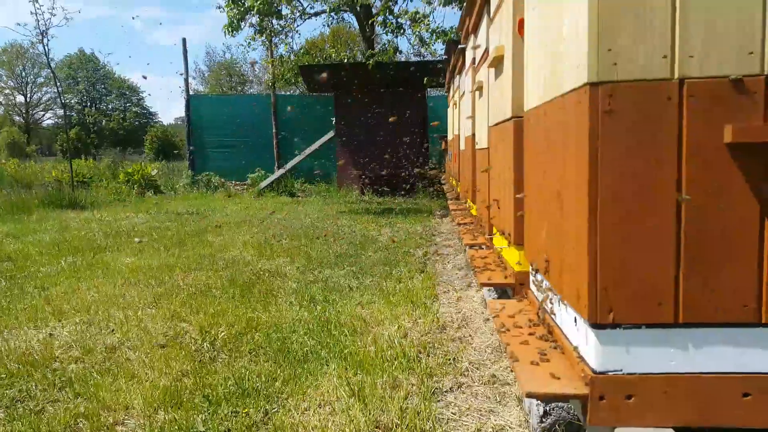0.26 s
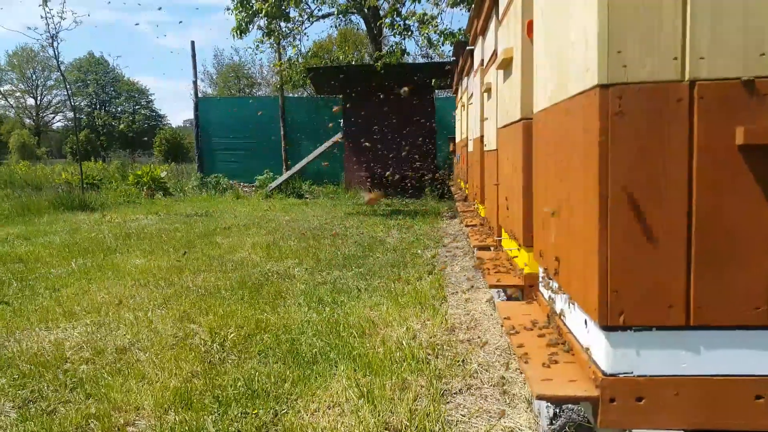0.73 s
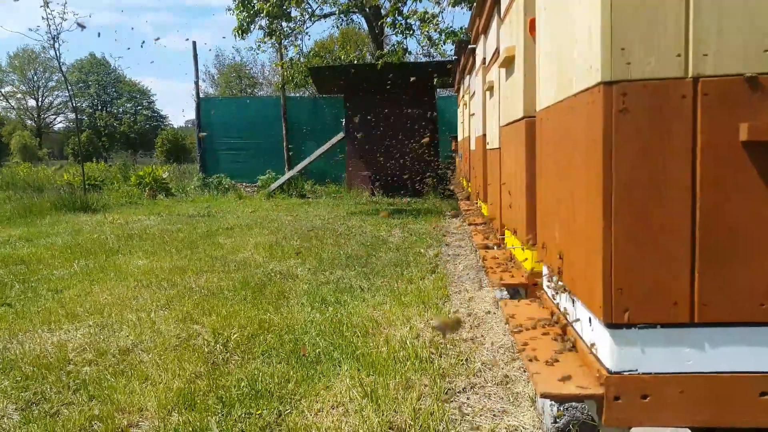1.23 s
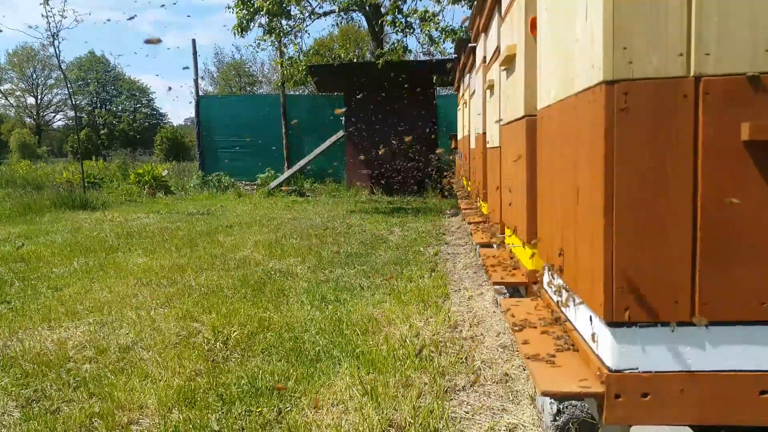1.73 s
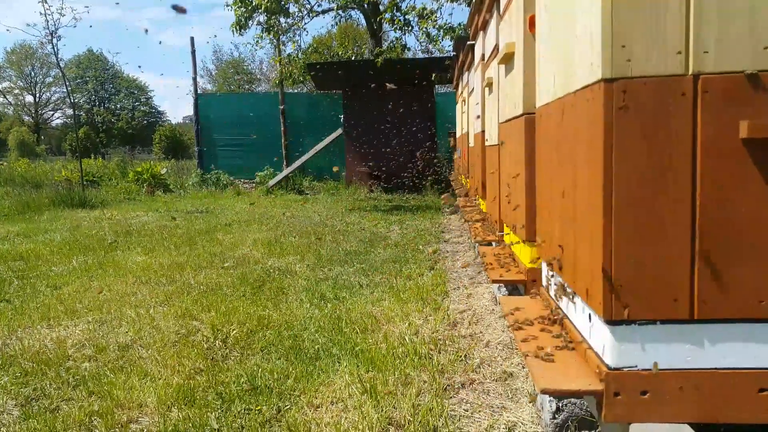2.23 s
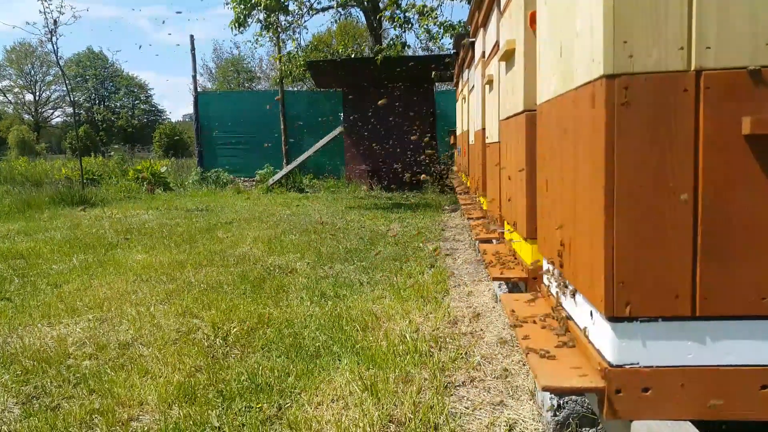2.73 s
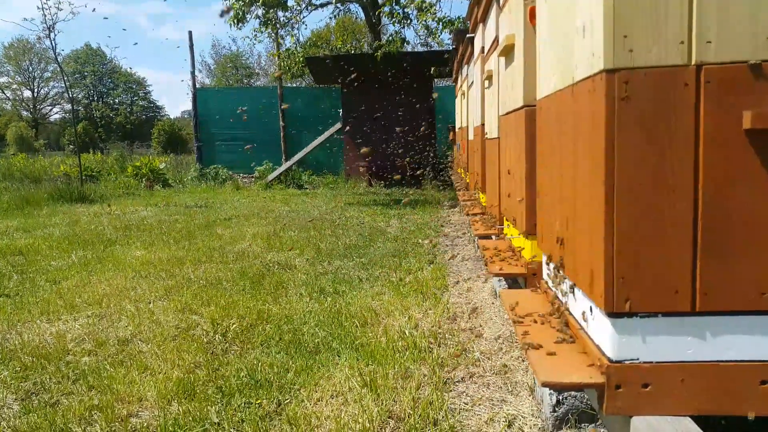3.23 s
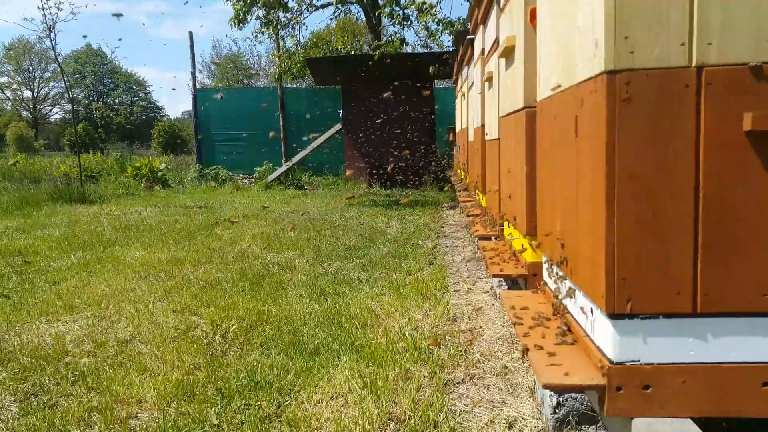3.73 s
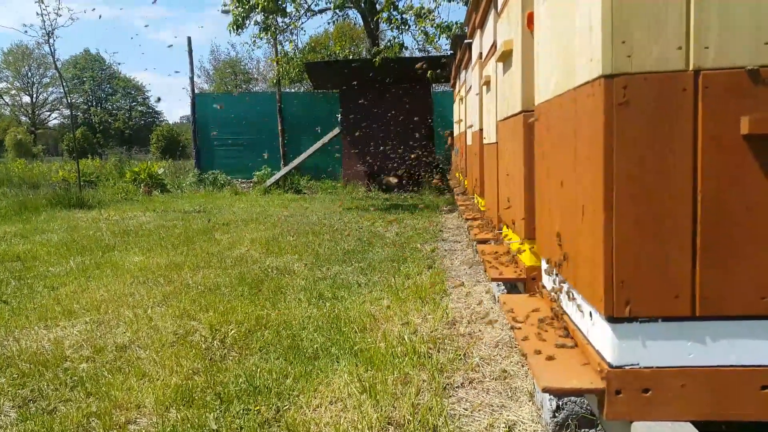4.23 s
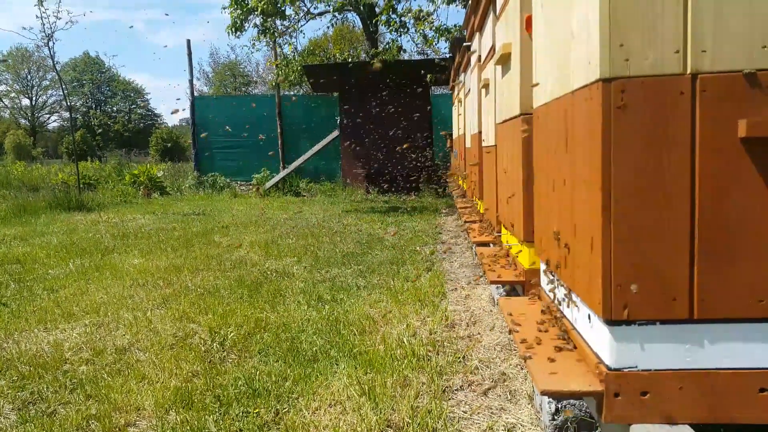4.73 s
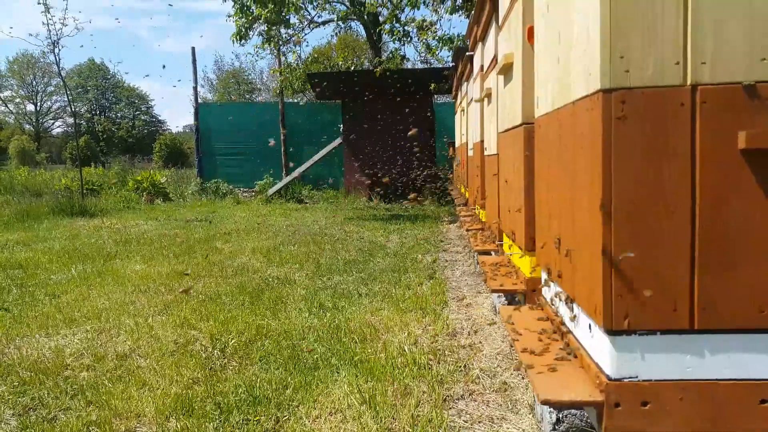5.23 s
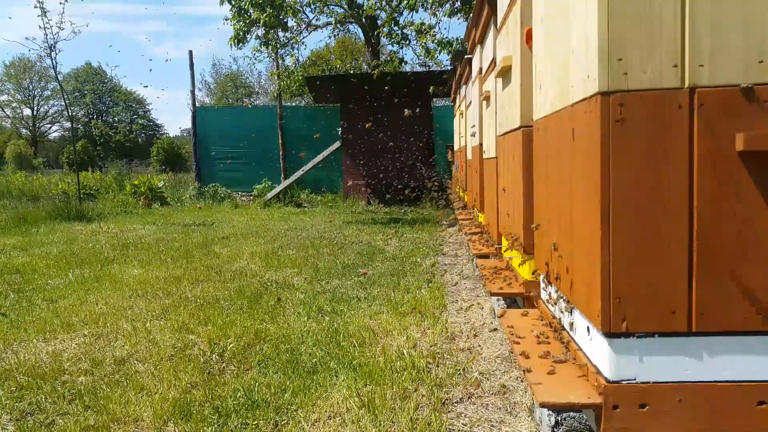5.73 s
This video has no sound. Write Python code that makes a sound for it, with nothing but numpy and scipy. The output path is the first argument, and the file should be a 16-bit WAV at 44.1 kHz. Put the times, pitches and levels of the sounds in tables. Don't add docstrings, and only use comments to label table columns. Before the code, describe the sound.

A swarm buzzes close to a camera beside a row of hives outdoors, a blurred mass of low wing beats with a raspy edge. Individual bees swing near, then deeper ones pass, most strongly around the middle. Small taps, ticks and two hard bumps interrupt the hum. Low, lumpy wind buffets both sides; faint hiss lies underneath. The left side sounds covered, the right open and clearer.

```python
import sys
import numpy as np
from scipy import signal
from scipy.fft import rfft, irfft, next_fast_len
from scipy.io import wavfile
from scipy.ndimage import map_coordinates

SR = 44100
rng = np.random.default_rng(int(sys.argv[2]) if len(sys.argv) > 2 else 0)


def to_linear_factor(level_db):
    exponent = np.asarray(level_db, float) / 20
    return 10 ** exponent


def unload_audio(sound):
    columns = np.transpose(np.atleast_2d(sound))
    steps = np.round(np.clip(columns, -1, 1) * 32767)
    wavfile.write(sys.argv[1], SR, steps.astype(np.int16))


N = 263277
STEP = 4
RASP_DB = -47


# f/Hz, level/dB
OPEN_PORT = [(120, 1.5), (500, -1.5), (700, -5), (1000, 1.5), (1400, 1.5), (1750, -3), (2100, -9.5),
             (3500, -12.5), (4700, -22.5), (6500, -26.5), (9000, -33), (16000, -60)]
COVERED_PORT = [(120, -3), (250, -16), (480, -23), (800, -17.5), (1300, -30), (2500, -28.5), (4000, -52),
                (6000, -57), (16000, -70)]


def bees():
    near = near_swarm() + drones() + hovering_bee()
    far_left, far_right = far_swarm()
    left = coloured(near[0], COVERED_PORT) + to_linear_factor(-16.5) * far_left
    right = coloured(near[1] + far_right, OPEN_PORT)
    return np.array([left, right])


def near_swarm():
    thick_db = swarm_thickness()
    rasp = crowd(count=50, beat_hz=226.1, spread=.15, orders=range(3, 20), swell_db=4, drift=.035)
    beat = crowd(count=28, beat_hz=233.6, spread=.12, orders=[1], swell_db=4.5, drift=.04)
    octave = crowd(count=34, beat_hz=225.9, spread=.14, orders=[2], swell_db=4, drift=.045)
    hum = to_linear_factor(RASP_DB + 3.0) * rasp + to_linear_factor(-52.5 - 1.0) * beat + to_linear_factor(-50.5 + 0.34) * octave
    return to_linear_factor(thick_db) * hum


# t/s, level/dB
SWARM = [
    (.6, -0.5),
    (1.85, .5),
    (3, 0),
    (4.3, -0.5),
    (5.1, 0.15),
    (5.9, -0.5),
]


def swarm_thickness():
    thick_db, = curves(SWARM)
    return thick_db


def crowd(count, beat_hz, spread, orders, swell_db, drift):
    own_rate = spread * rng.uniform(-1, 1, (count, 1))
    waver = drift * wobble(5, count) + .012 * wobble(35, count)
    hz = beat_hz * (1 + own_rate + waver)
    tone = wings(hz, orders) * to_linear_factor(swell_db * wobble(8, count))
    left = (tone * wobble(9, count)).sum(axis=0)
    right = tone.sum(axis=0)
    return unit(full(np.array([left, right])))


def wings(hz, orders, tilt_db=0):
    size = 2048
    cycle = np.arange(size) / size
    shape = 0
    for k in orders:
        strength = to_linear_factor(tilt_db * k + rng.normal(0, 2.9, (len(hz), 1)))
        phase = rng.random((len(hz), 1))
        shape = shape + strength * np.sin(2 * np.pi * (k * cycle + phase))
    place = (np.cumsum(hz, axis=1) * STEP / SR * size).astype(int) % size
    return np.take_along_axis(shape, place, axis=1)


# t/s, half length/s, level rise/dB
DRONES = [
    (1.05, .2, 6),
    (1.9, .15, -1),
    (2.88, .12, 12),
    (3.65, 0.14, 9),
    (4.0, 0.25, 15),
    (4.35, 0.13, 11.5),
    (4.8, 0.16, 7.5),
    (5.75, 0.24, 8),
]


def drones():
    level_db = -61 + swells(DRONES)[0]
    return to_linear_factor(level_db - 5) * crowd(count=4, beat_hz=146.7, spread=.025, orders=[1], swell_db=4.0, drift=0.01197)


# t/s, f/Hz
HOVER = [
    (1.65, 245),
    (1.85, 246),
    (2.05, 236),
    (2.4, 240),
    (2.7, 239),
    (2.95, 226),
]
# t/s, half length/s, level rise/dB
SWAYS = [
    (1.73, 0.027, 15),
    (2.05, 0.095, 1),
    (2.25, 0.14, 14.5),
    (2.46, 0.04, 13),
    (2.71, 0.058, 13),
]


def hovering_bee():
    hover_hz, = curves(HOVER)
    level_db = -72 + swells(SWAYS)[0]
    present = np.interp(np.arange(N) / SR, [1.6, 1.75, 2.85, 3], [0, 1, 1, 0])
    beat_hz = hover_hz[None, ::STEP] * (1 + 0.0074 * wobble(26.7, count=1))
    tone = unit(full(wings(beat_hz, range(1, 3), tilt_db=-18)))
    return present * to_linear_factor(level_db + 7.5) * tone


# f/Hz, level/dB
BLUR = [
    [(150, -30), (300, -2), (900, -25), (2800, -37), (5000, -18), (9000, -17)],
    [(150, 1.5), (300, 3), (700, 3), (1500, 2.5), (5000, 7), (9000, -12.5)],
]


def far_swarm():
    level = to_linear_factor(RASP_DB + swarm_thickness() + 6)
    return [level * coloured(rng.standard_normal(N), port) for port in BLUR]


# t/s, push level/dB, contact/ms,
# sharpness of the rebound, cavity ring level/dB
BUMPS = [(0.7014, -25.5, 0.17, 0.84, -36), (0.7283, 0, 0.55, 1.5, -14), (0.8275, -15.5, 1.14, 0.73, -48),
         (1.349, -25, 2, 1.8, -60), (3.14, -24.5, 1.5, 1.3, -60), (3.201, -27, 1.8, 1, -60),
         (3.328, -24.5, 2.23, 1.3, -60), (4.09, -25, 1.5, 0.7, -60), (4.505, -30, 1.93, 1.7, -60),
         (5.3243, -3, 0.57, 1.66, -20.5), (5.4146, -13, 1.04, 1.0, -60)]
# f/Hz, level/dB, t60/s
HOUSING = [(94, -25, 0.069), (163, -26, 0.0505), (305, -38, 0.025)]


def bumps():
    out, t = np.zeros((2, N)), np.arange(SR // 8) / SR
    jw = 2j * np.pi * np.fft.rfftfreq(len(t), 1 / SR)
    corner, vent = 2 * np.pi * 88, 2 * np.pi * 160
    cavity = ring(1400, 0.0091, t) + 0.45 * ring(3000, 0.0042, t) + 0.71 * ring(460, 0.022, t)
    for s, db, ms, sharp, ring_db in BUMPS:
        contact = t / (ms / 1000)
        push = to_linear_factor(db) * contact * np.exp(1 - contact)
        membrane = jw ** 2 / (jw ** 2 + jw * corner / sharp + corner ** 2)
        cut = membrane * jw / (jw + vent)
        right = irfft(rfft(push) * cut, len(t)) + to_linear_factor(ring_db) * cavity
        right = soft(right, hz=min(850 / ms ** 2, 3600))
        shake = sum(to_linear_factor(db + level) * ring(hz, t60, t) for hz, level, t60 in HOUSING)
        left = -shake * (1 - np.exp(-t / 0.0032)) - to_linear_factor(-31.0) * right
        out[:, round(s * SR):][:, :len(t)] += [left, right]
    return out


# t/s, f/Hz, t60/ms, left level/dB, right level/dB
TAPS = [(.8783, 200, 30, -30, -60), (0.8782, 430, 16, -37, -20.5), (.8789, 1450, 5, -53, -25),
        (.882, 114, 60, -29, -60), (2.2085, 420, 14, -39, -60), (2.2087, 1500, 6, -44, -60),
        (2.7225, 95, 45, -33, -70), (3.1153, 6000, 1.2, -70, -49), (3.11542, 1650, 3.4, -70, -17.5),
        (3.11612, 1220, 4.8, -70, -20), (4.2485, 453.6, 14, -41, -56), (4.2505, 1200, 6, -43, -60),
        (4.68, 90, 40, -33, -70), (5.13, 8500, 1.5, -75, -58), (5.4128, 2200, 3, -70, -45)]


def taps():
    out, t = np.zeros((2, N)), np.arange(SR // 8) / SR
    for s, hz, ms, left_db, right_db in TAPS:
        tap = soft(ring(hz, ms / 1000, t), hz=2.4 * hz)
        out[:, round(s * SR):][:, :len(t)] += to_linear_factor([[left_db], [right_db]]) * tap
    return out


def ring(hz, t60, t):
    return np.sin(2 * np.pi * hz * t) * to_linear_factor(-60 * t / t60)


def soft(x, hz):
    return signal.sosfilt(signal.butter(6, hz, fs=SR, output="sos"), x)


# start t/s, end t/s, level/dB
FLYBY = (0.677, .772, -46.5)


def flyby():
    start, end, db = FLYBY
    moments = [start, start + .03, start + .05, end - .025, end - .01, end]
    shape = np.interp(np.arange(N) / SR, moments, [0, 1.3, 0.56, 0.79, 0.41, 0])
    spectrum = [(500, 3.5), (4000, 4), (6500, -11), (8500, -19), (11000, -8.5), (14000, -19)]  # f/Hz, level/dB
    air = coloured(rng.standard_normal(N), spectrum)
    flutter = to_linear_factor(3.8 * full(wobble(59.43, count=1))[0])
    return to_linear_factor([[db - 40], [db]]) * shape * unit(air * flutter)


# f/Hz, level/dB
BUFFET = [
    [(20, -22), (45, 0.5), (100, -0.5), (150, -6.5), (260, -23), (400, -25), (2000, -67)],
    [(20, -24), (40, -17), (70, -3), (120, -3.5), (200, -6.5), (320, -16.5), (800, -20), (2000, -61)],
]
CALM_DB = [
    [-55],
    [-58],
]
# t/s, half length/s, left level rise/dB, right level rise/dB
GUSTS = [(.58, .06, 4, 4), (.85, 0.13, 7, 12), (1.1, 0.146, -3.5, 6.5), (1.4, 0.17, 4, 4),
         (1.68, 0.15, 0.5, 5), (1.97, 0.052, 6, 1), (2.12, 0.093, 0, 6.5), (2.28, .06, 1, 0),
         (2.68, 0.073, -3, 6), (2.86, 0.17, 7, 0), (3.2, 0.12, 1.5, 10), (3.39, 0.12, 3, 7.5),
         (3.6, 0.12, 4.5, 9), (4.12, 0.11, 0, 12.5), (4.35, 0.09, 9, 11), (4.52, 0.046, -1, 8.5),
         (4.72, 0.076, 5.5, 0), (5.1, .08, 3, 2), (5.45, 0.11, 4.5, 12.5), (5.74, 0.1, -1, 8.5),
         (5.9, 0.071, 2, -3)]


def wind():
    lumps = to_linear_factor(1.75 * full(wobble(14, count=2)))
    air = np.array([unit(coloured(rng.standard_normal(N), port)) for port in BUFFET])
    rising_db = np.interp(np.arange(N) / SR, [.3, .6], [-6, 0])
    return to_linear_factor(CALM_DB + swells(GUSTS) + 1.0 + rising_db) * unit(air * lumps)


# f/Hz, level/dB
HISS = [
    [(300, 12), (3000, 1.5), (6500, -12.5), (10000, -2), (15500, 4.5)],
    [(300, -11), (7500, -3), (9000, -5), (10500, 1.5), (12500, 0.5), (15500, -2)],
]


def camera_noise():
    hiss = to_linear_factor(-68.5) * np.array([unit(coloured(rng.standard_normal(N), port)) for port in HISS])
    clock = to_linear_factor(-92) * np.sin(2 * np.pi * 12000 * np.arange(N) / SR) * [[0], [1]]
    return hiss + clock


def unit(x):
    return x / np.sqrt(np.mean(x ** 2, axis=-1, keepdims=True) + 1e-20)


def curves(rows):
    s, *cols = np.transpose(rows)
    return [np.interp(np.arange(N) / SR, s, c) for c in cols]


def swells(rows):
    s, half, *rise_db = np.transpose(rows)
    distance = (np.arange(N) / SR - s[:, None]) / half[:, None]
    return np.array(rise_db) @ np.exp(-distance ** 2)


def wobble(rate, count):
    knots = rng.standard_normal((count, 400))
    places = np.arange(0, N + 128, 64) * rate / SR
    rows, at = np.meshgrid(np.arange(count), places, indexing="ij")
    curve = map_coordinates(knots, [rows, at])
    return np.repeat(curve, 64 // STEP, axis=1)[:, :N // STEP + 1]


def full(x):
    return signal.resample_poly(x, STEP, 1, axis=-1)[..., :N]


def coloured(x, points):
    m = next_fast_len(N + 8192)
    f, db = np.transpose(points)
    hz = np.fft.rfftfreq(m, 1 / SR)
    gain = to_linear_factor(np.interp(np.log(hz + 1), np.log(f), db))
    return irfft(rfft(x, m) * gain, m)[:N]


def scene():
    return bees() + bumps() + taps() + flyby() + wind()


def band_limit(x):
    return signal.sosfilt(signal.butter(12, 15780, fs=SR, output="sos"), x)


# f/Hz, level/dB
TOP = [(15740, 0), (15780, -90)]
# start t/s, end t/s
FADE = (0.27, 0.54)


def record(dry):
    heard = np.array([coloured(port, TOP) for port in dry + camera_noise()])
    offset = -6e-4
    mix = (heard + offset) * np.interp(np.arange(N) / SR, FADE, [0, 1])
    return band_limit(mix)


dry = scene()
out = record(dry)
unload_audio(out)
```